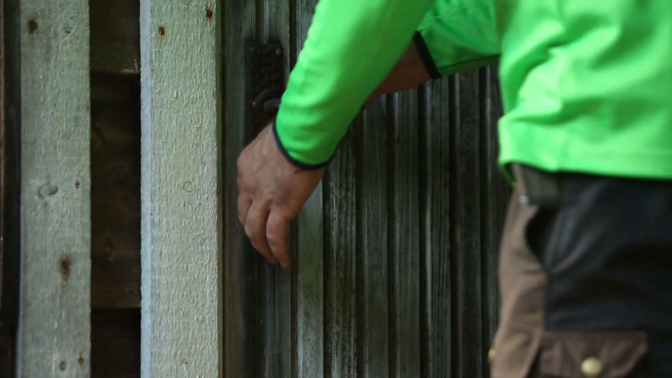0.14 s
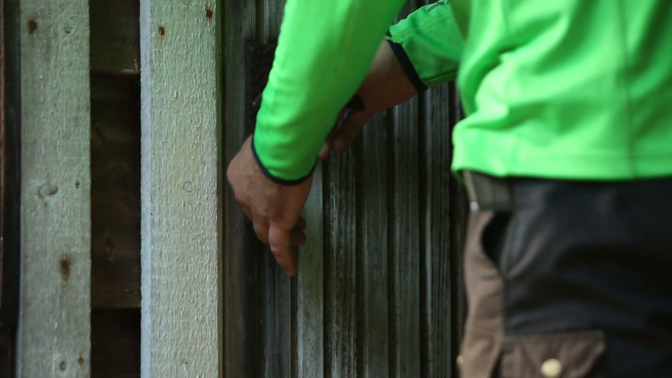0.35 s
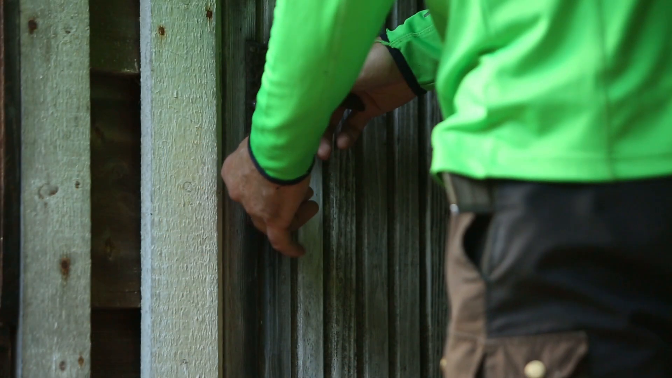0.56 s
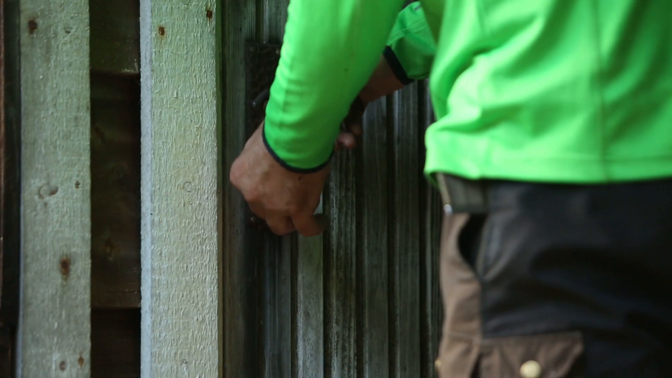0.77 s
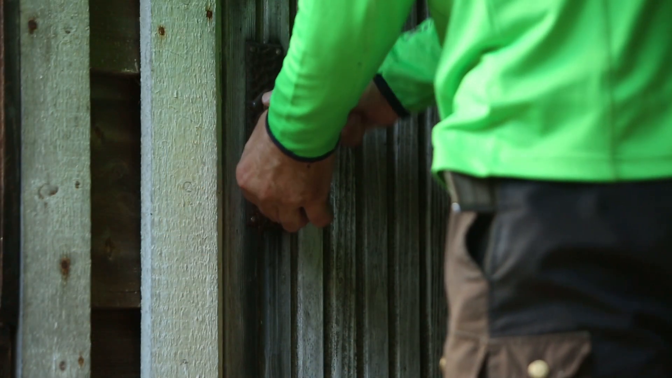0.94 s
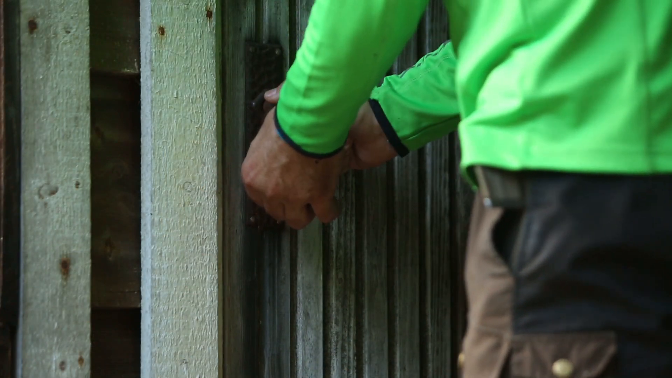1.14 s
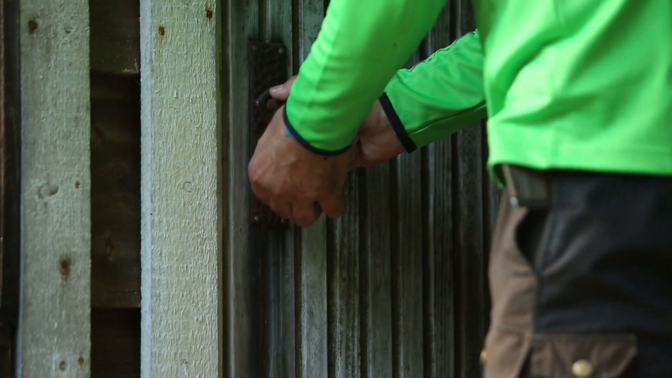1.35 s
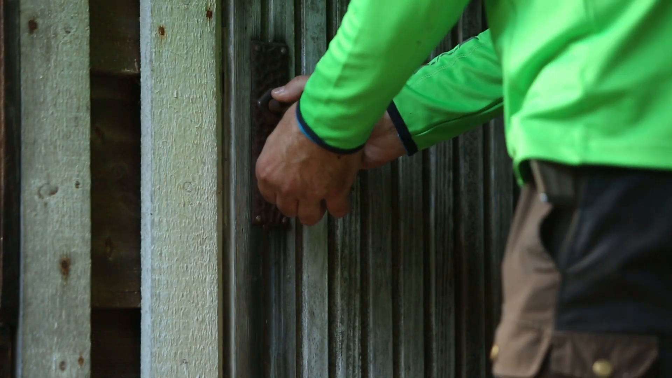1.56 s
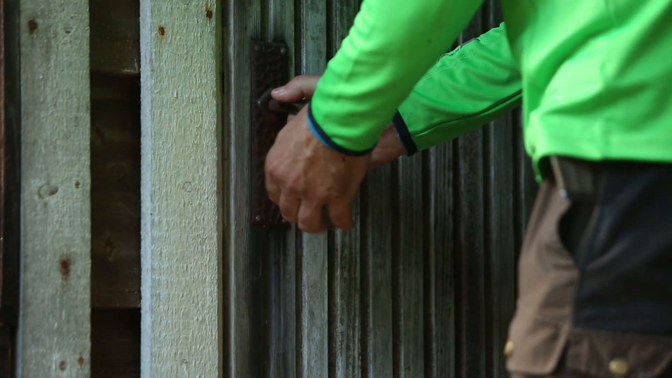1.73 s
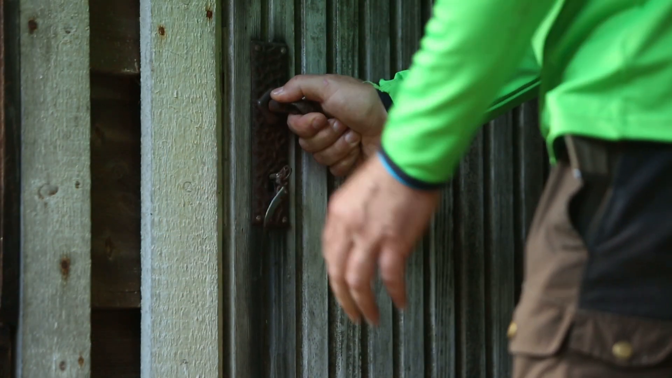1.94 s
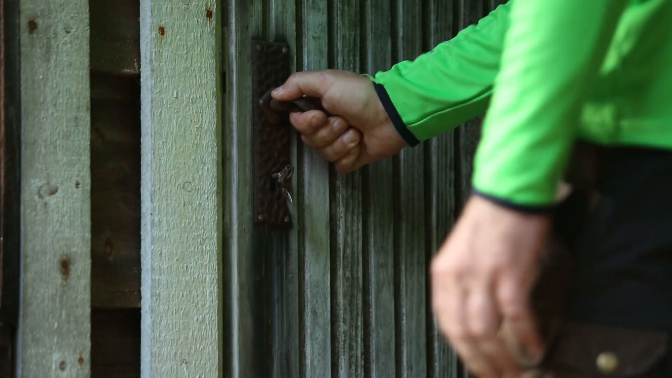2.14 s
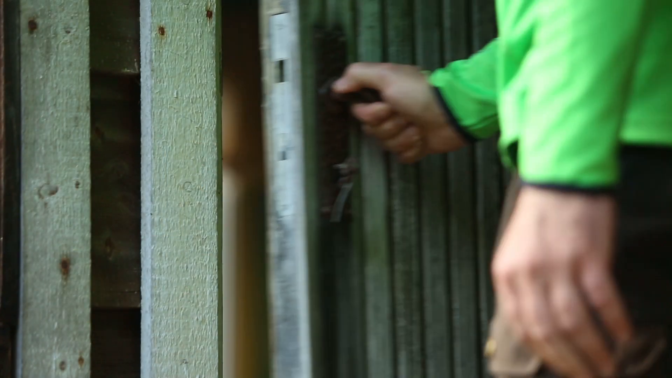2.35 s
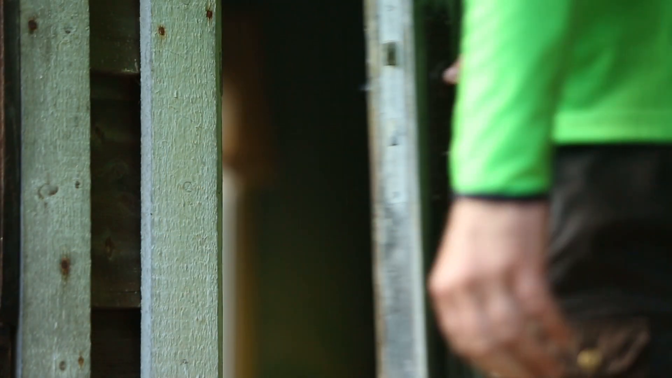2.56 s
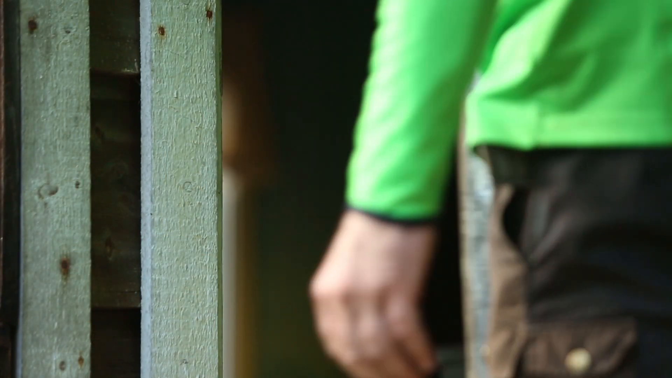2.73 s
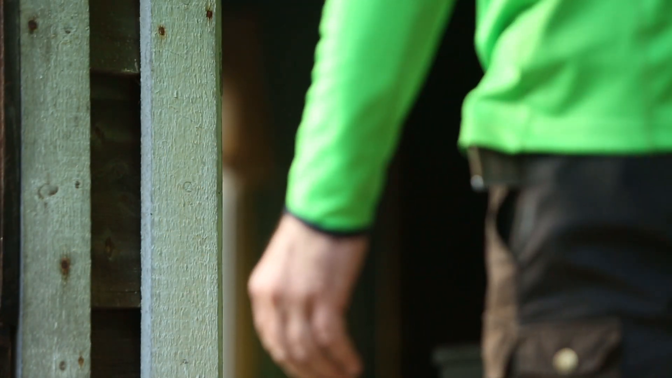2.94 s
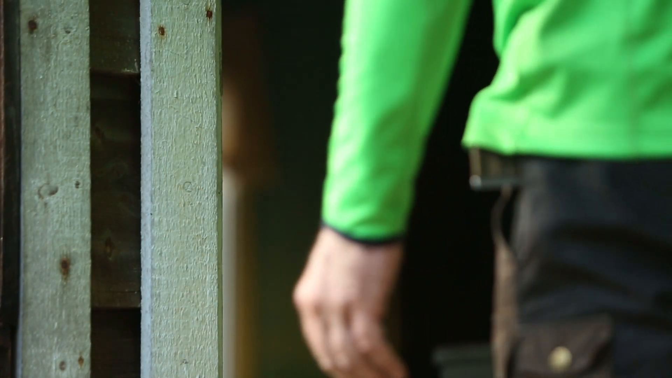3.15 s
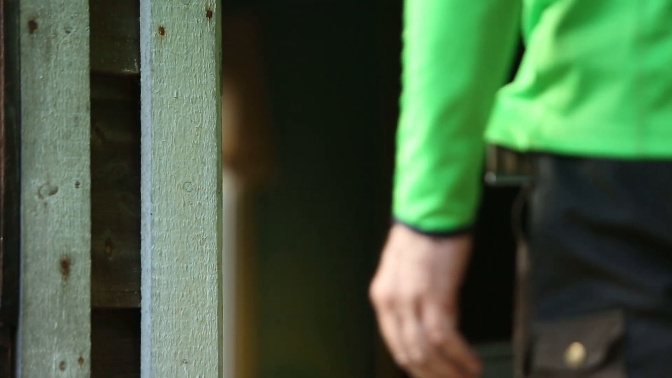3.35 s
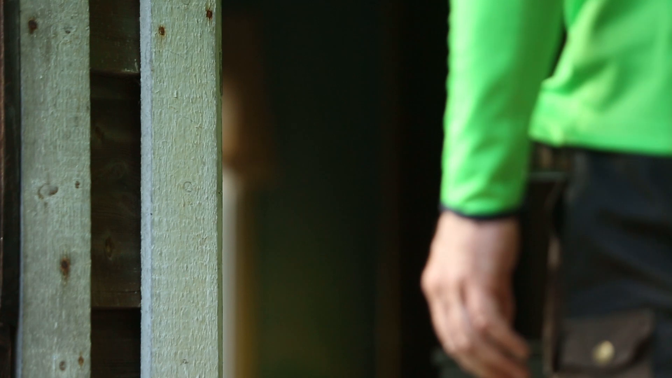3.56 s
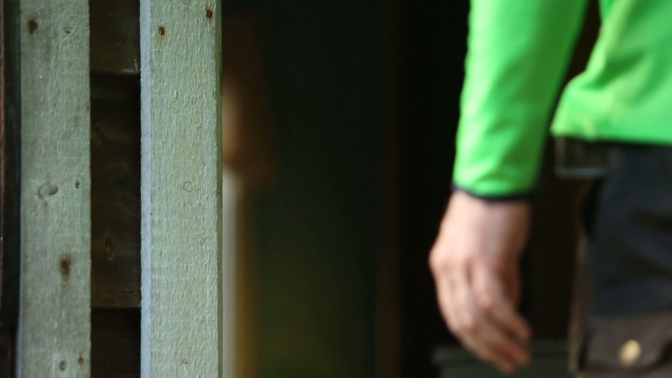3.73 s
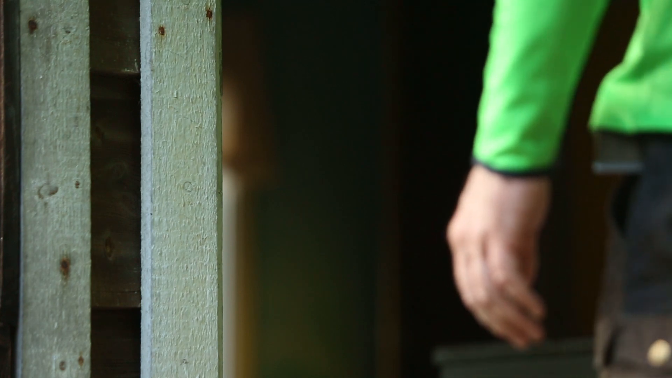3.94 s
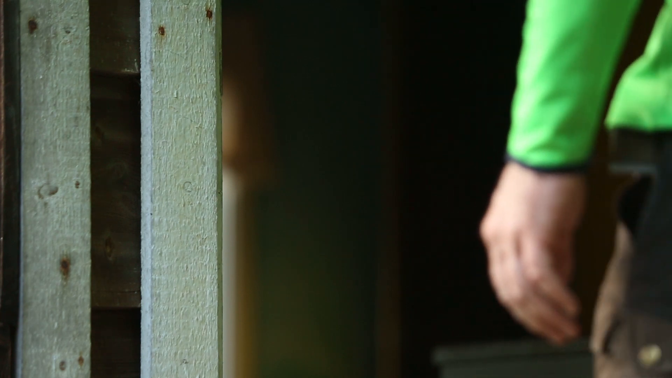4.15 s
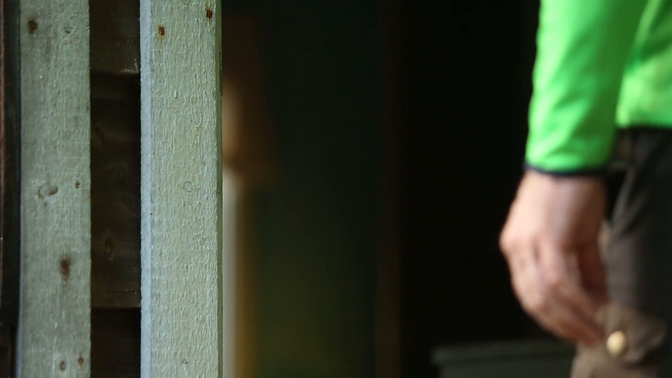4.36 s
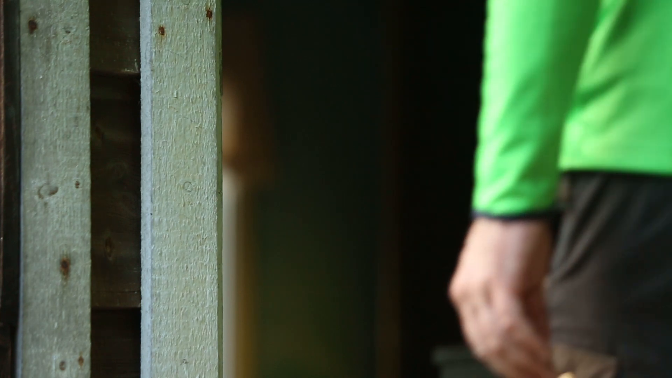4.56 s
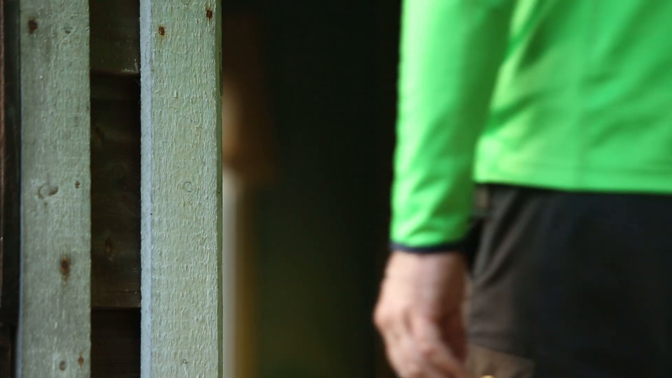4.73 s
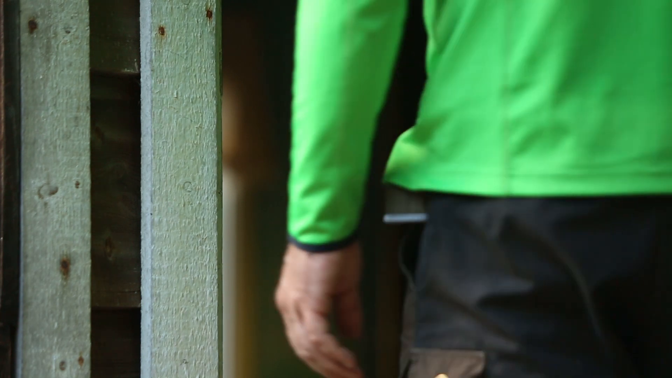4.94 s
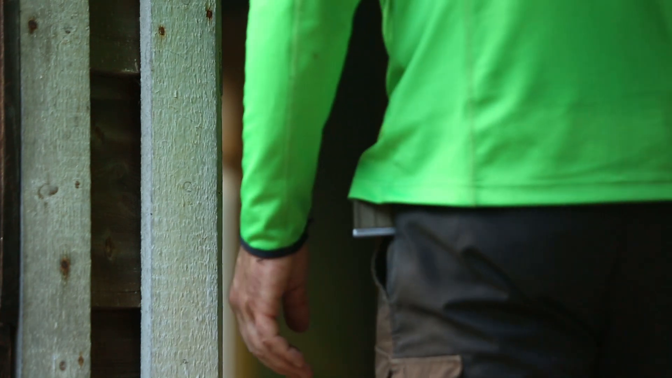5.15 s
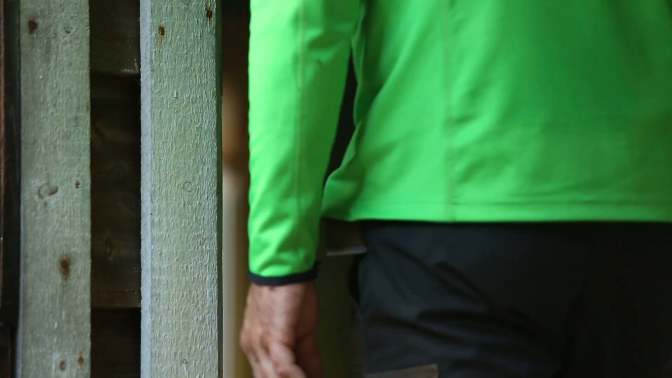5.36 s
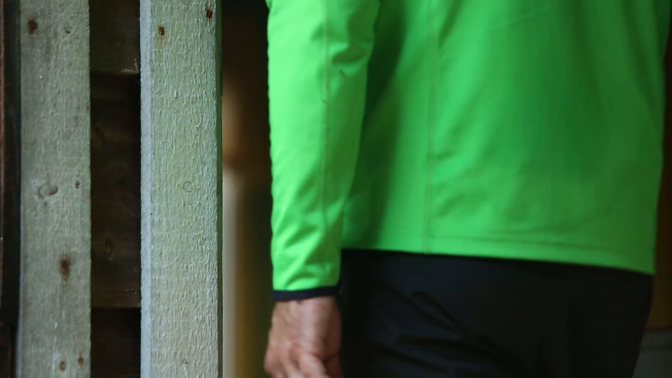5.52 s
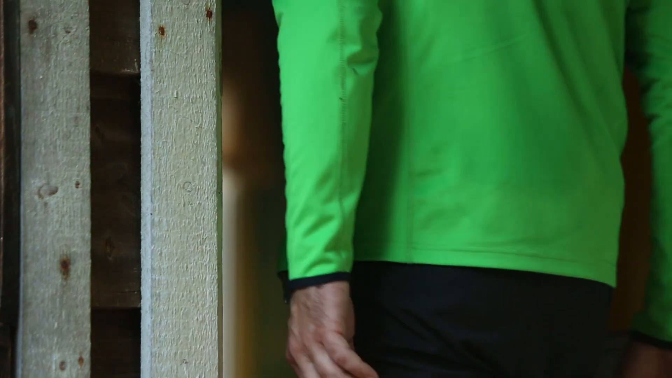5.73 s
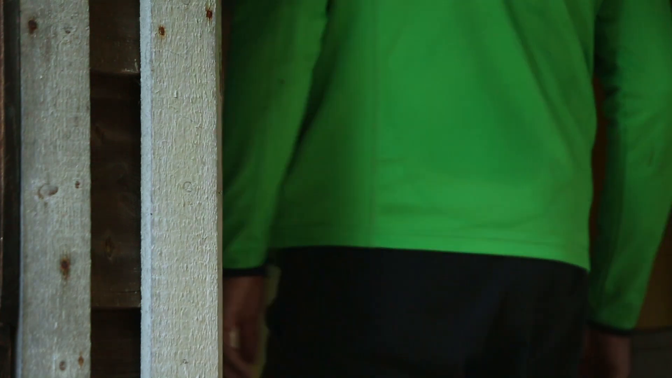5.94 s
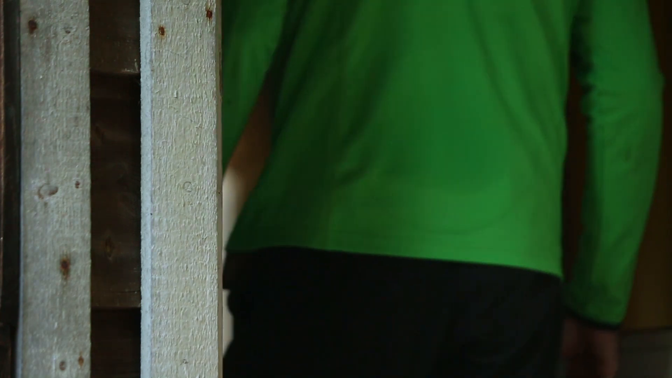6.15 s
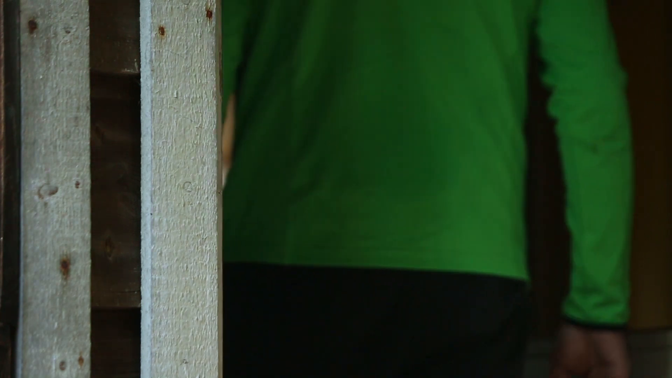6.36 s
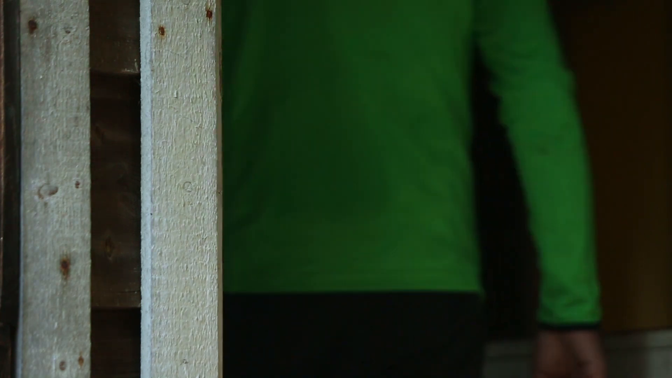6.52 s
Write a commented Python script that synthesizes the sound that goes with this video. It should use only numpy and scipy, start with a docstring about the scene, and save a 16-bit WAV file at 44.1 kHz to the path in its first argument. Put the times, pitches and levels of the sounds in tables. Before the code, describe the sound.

A close, quiet scene at an old plank door, with faint outdoor air and slight hiss. In the first 0.3 seconds there is soft sleeve rubbing and faint low footfalls. Thin metal key ticks follow at 0.3 to 1.0 seconds, the last with a dull wooden knock. A rattling jolt comes at 1.1, then at 1.3 to 1.5 a tight burst of bright knocks and bolt scraping ends in a low shudder. Small ticks precede the sprung handle's sharp ringing snap at 1.9. At 2.25 the sticking door jerks free with a hard woody jolt, then rasps over the sill at about 2.55. A boot booms softly at 3.2, iron fittings clack crisply at 3.7, and a tiny creak comes at 3.95. Boots thud on hollow boards at 4.6 to 5.1, strongest at 5.6, with lighter contacts following and a last soft step at 6.55.

```python
"""A cabin's old plank door is opened, close by: a hanging key ticks, the handle turns and drags the bolt back,
the handle snaps against its stop, and the sticking door jerks free, scrapes over the sill and faintly creaks.
Its iron fittings clack once as it swings wide; boots thud on the floorboards, hardest near the end.
Blows are decaying noise (crowded modes) and decaying sines (separate modes); rubbing and scraping are trains
of tiny slips through the body's resonances; a short room tail and quiet filtered noise complete the scene."""
import sys
import numpy as np
from scipy import signal
from scipy.fft import rfft, irfft, next_fast_len
from scipy.io import wavfile

SR = 44100
rng = np.random.default_rng(int(sys.argv[2]) if len(sys.argv) > 2 else 0)


def wrap_up_sound(samples):
    """Save the sound to the file named by the first command line argument, as 16-bit audio."""
    columns = np.atleast_2d(samples).T
    # keep every value between -1 and 1, then stretch to whole-number steps
    tamed = np.clip(columns, -1, 1)
    steps = np.round(tamed * 32767).astype(np.int16)
    wavfile.write(sys.argv[1], SR, steps)


N = 290619
TOP_HZ = 15850
T = np.arange(SR // 2) / SR  # seconds since a blow or the start of a stroke
HZ = np.fft.rfftfreq(len(T), 1 / SR)


def amp(db):
    """The decibel law: level to amplitude gain."""
    return 10 ** (np.asarray(db) / 20)


def unit(x):
    """Equal power: scale to rms 1."""
    return x / np.sqrt(np.mean(x ** 2) + 1e-20)


def blow(x):
    """Equal energy: scale to that of 10 ms at rms 1."""
    return x / np.sqrt(np.sum(x ** 2) / (SR / 100) + 1e-20)


def along(points, hz):
    """Interpolate (Hz, value) points on a logarithmic frequency axis, as the ear spaces pitch."""
    f, v = np.transpose(points)
    return np.interp(np.log(hz + 1), np.log(f + 1), v)


def tilt(slope_db):
    """Spectral slope: so many dB an octave about 1 kHz, level below 300 Hz."""
    octaves = np.log2(np.clip(HZ, 300, None) / 1000)
    return amp(slope_db * octaves)


def resonances(peaks):
    """Resonance: (Hz, width in Hz, dB) peaks added to a flat gain of 1."""
    return 1 + sum(amp(db) / (1 + (2 * (HZ - hz) / width) ** 2) for hz, width, db in peaks)


def filtered(x, response):
    """Linear filtering: the spectrum of x times a response of frequency."""
    m = next_fast_len(N + SR // 2)
    spectrum = rfft(x, m) * response(np.fft.rfftfreq(m, 1 / SR))
    return irfft(spectrum, m)[..., :N]


def add(track, s, x):
    """Superposition: mix x into the track from time s in seconds."""
    part = track[max(round(s * SR), 0):][:len(x)]
    part += x[:len(part)]


def burst(colour, decay, length=1, rise=0.0001):
    """High modal density: crowded modes struck at once act as noise whose bands die at their own speeds."""
    centres = np.geomspace(40, 16000, 10)
    shares = np.array([np.interp(np.log(HZ + 1), np.log(centres), row) for row in np.eye(len(centres))])
    noise = rfft(rng.standard_normal(len(T))) * colour
    bands = irfft(noise * shares, len(T))
    t60 = length * along(decay, centres)[:, None]
    fade = amp(-60 * T / t60)
    return blow(np.sum(bands * fade, axis=0) * (1 - np.exp(-T / rise)))


def ring(modes, rise=0.00013):
    """Modal ringing: separate (Hz, dB, t60 in seconds) modes die away, their balance new for each blow."""
    tones = np.zeros(len(T))
    for k, (hz, db, t60) in enumerate(modes):
        level_db = db + 1.5 * rng.standard_normal() - 60 * T / t60
        tones += (-1) ** k * amp(level_db) * np.sin(2 * np.pi * hz * T)
    return blow(tones * (1 - np.exp(-T / rise)))


def friction(colour, length, rise, fall, slip_rate):
    """Stick-slip: tiny slips of uneven size excite a body while a stroke swells, holds and dies."""
    slips = (rng.random(len(T)) < slip_rate / SR) * rng.laplace(size=len(T))
    # the stroke falls 40 dB in each fall time
    stroke = np.minimum(T / rise, 1) * 10 ** (-2 * np.maximum(T - length, 0) / fall)
    return stroke * unit(irfft(rfft(slips) * colour, len(T)))


def background():
    """Steady broadband noise: still outdoor air in the centre, faint hiss in opposite phase at the sides."""
    # Spectrum of the air. Each row: frequency in Hz, relative level in dB.
    air_spectrum = [(12, -45), (20, -17), (137, -3.5), (175, -3), (274, -2), (352, -3), (382, -3.5),
                    (478, -5.5), (906, -9.5), (2150, -14), (2760, -15), (6020, -15.5), (15500, -21.5)]
    # Spectrum of the hiss. Each row: frequency in Hz, relative level in dB.
    hiss_spectrum = [(12, -33), (20, -4), (98, -2), (427, -4.5), (549, -4.5), (1070, -7.5), (15500, -6)]
    air = unit(filtered(rng.standard_normal(N), lambda hz: amp(along(air_spectrum, hz))))
    hiss = unit(filtered(rng.standard_normal(N), lambda hz: amp(along(hiss_spectrum, hz))))
    return amp(-62.0) * air + amp(-67) * np.array([hiss, -hiss])


def planks():
    """Source and filter: knocks and rubbing sound through this one response of the timber."""
    # Broad response of the wood. Each row: frequency in Hz, gain in dB.
    wood = [(60, -29), (200, -1.5), (450, 3), (800, 2), (1400, -3.5), (2500, -6), (5500, -11.5),
            (8500, -21.5), (15000, -31.5)]
    # Resonances of the planks. Each row: frequency in Hz, width in Hz, height in dB against the flat part.
    plank_peaks = [(424, 89, -6), (1090, 31, -3), (1394, 68, -4.5), (1945, 60, -7), (2950, 32, 2)]
    return amp(along(wood, HZ)) * resonances(plank_peaks)


def rubs():
    """Sliding friction: sleeve, bolt and door edge rub, grit scrapes under a boot, through one wooden response."""
    # Strokes. Each row: start in seconds, end of the hold in seconds, level in dB,
    # time to fall 40 dB in seconds, brightness in dB per octave.
    strokes = [(0, 0.16, -61, .1, -4), (0.139, 0.214, -52, 0.32, 0.5), (1.352, 1.418, -45.5, 0.11, 3.5),
               (1.408, 1.488, -40, 0.081, 1), (1.795, 1.91, -59, 0.39, -0.5),
               (2.128, 2.191, -55.5, 0.14, 4), (2.278, 2.33, -43.5, 0.12, 1.5),
               (2.371, 2.425, -59, 0.61, 1)]
    out = np.zeros(N)
    wood = planks()
    for start, end, db, fall, bright_db in strokes:
        rub = friction(wood * tilt(bright_db), end - start, rise=0.022, fall=fall, slip_rate=5000)
        add(out, start, amp(db) * rub)
    return out


def steps():
    """Impact on a plate over a cavity: heel, then sole, knock on a board and set the hollow floor booming."""
    # Footfalls. Each row: heel time in seconds, relative boom level in dB, relative knock level in dB,
    # board pitch factor.
    footfalls = [(0.011, -56, -70, 1.16), (0.158, -56, -56, 0.96), (0.258, -58.5, -48, 1.1),
                 (2.138, -44, -44, 0.896), (3.172, -37.5, -51.5, 1.05), (4.594, -43.5, -46, 0.89),
                 (4.736, -46, -49.5, 1.03), (5.099, -54, -55.5, 1.57), (5.632, -28, -31, 0.97),
                 (5.777, -44.5, -46, 1.4), (5.876, -55, -51.5, 0.99), (6.55, -51, -45.5, 0.964)]
    # Modes of the floor at pitch factor 1. Each row: frequency in Hz, relative level in dB, t60 in seconds.
    boards = [(100, -18.5, 0.097), (131, -5.5, 0.098), (154, -0.5, 0.13), (175.4, 0, 0.11),
              (209.4, -7.5, 0.13), (242.6, -12, 0.11), (314, -13.5, 0.18), (407, -20.5, 0.11)]
    # Spectrum of the knock. Each row: frequency in Hz, gain in dB.
    heel_spectrum = [(25, -50), (50, -5), (110, -1), (300, 1.5), (480, 5), (700, -4.5), (1100, -8),
                     (2200, -31), (4000, -29), (9000, -56), (15000, -75)]
    # Modes of the struck board itself at pitch factor 1. Each row: frequency in Hz, relative level in dB,
    # t60 in seconds.
    struck_board = [(326, 0, 0.031), (541, -3, 0.056), (733, -6, 0.043)]
    boom_gain_db, rap_db = 2.5, -5  # the rap is taken against the knock
    sole_lag_s, sole_base_db, sole_bright_db = .038, -12, 2.5  # brightness in dB per octave
    sole_share = 0.27  # dB more on the sole for each dB that the heel is softer
    out = np.zeros(N)
    heel = amp(along(heel_spectrum, HZ)) * resonances([(290, 35, 1.7), (442, 79, 1.8), (716, 40, 0.92)])
    for s, boom_db, knock_db, pitch in footfalls:
        floor_modes = [(hz * pitch, db, t60) for hz, db, t60 in boards]
        # the struck board is half as sensitive to the spot
        board_modes = [(hz * np.sqrt(pitch), db, t60) for hz, db, t60 in struck_board]
        sole_db = sole_base_db + sole_share * (boom_db - knock_db)
        for at, db, bright_db in [(s, 0, 0), (s + sole_lag_s, sole_db, sole_bright_db)]:
            knock = burst(heel * tilt(bright_db), [(200, 0.096), (800, 0.17), (4000, 0.22)], rise=0.00016)
            add(out, at, amp(boom_db + db + boom_gain_db) * ring(floor_modes, rise=0.0026))
            add(out, at, amp(knock_db + db + rap_db) * ring(board_modes, rise=.0007))
            add(out, at, amp(knock_db + db) * knock)
    # the footfalls keep nothing deep below 75 Hz
    return signal.sosfilt(signal.butter(3, 75, "high", fs=SR, output="sos"), out)


def key():
    """Light impact: metal ticks on the lock plate, each with a thin, high modal ring."""
    # Ticks on the plate. Each row: time in seconds, tick level in dB, ring level in dB.
    ticks = [(0.316, -50.5, -57.5), (0.369, -51, -58), (0.576, -46, -57), (0.615, -59, -56.5),
             (0.75, -57.5, -69), (0.976, -45.5, -47.5), (1.719, -54.5, -59), (1.787, -48, -49.5),
             (2.237, -52, -48), (3.649, -59, -55.5)]
    # Modes of key and plate. Each row: frequency in Hz, relative level in dB before the upper modes are
    # shifted, t60 in seconds.
    key_modes = [(2250, -6, 0.25), (3530, -13, 0.097), (8605, 5, 0.13), (8460, -18, .08), (11170, 0, 0.21),
                 (13250, 0, 0.11), (13600, -9, .09)]
    upper_db, upper_spread_db = -4, 3  # shift of the modes above 10 kHz and its random spread
    out = np.zeros(N)
    colour = amp(along([(200, -5.5), (900, 4.5), (1700, -6.0), (2800, -5.0), (7000, -2.5), (15000, -23)], HZ))
    plate = resonances([(850, 120, 0), (1220, 51, 0), (2320, 240, 6), (3130, 480, 4)])
    for s, tick_db, ring_db in ticks:
        # the point of contact differs from tick to tick, and with it the mix of upper modes
        modes = []
        for hz, db, t60 in key_modes:
            shift_db = upper_db + upper_spread_db * rng.standard_normal()
            modes.append((hz, db + shift_db * (hz > 10000), t60))
        add(out, s, amp(tick_db) * burst(colour * plate, [(1000, 0.21), (10000, 0.1)], rise=.0012))
        add(out, s, amp(ring_db) * ring(modes))
    return out


def rattles(count):
    """Repeated impact: a jolt in the frame is a short first touch, a main blow and weaker rebounds."""
    # Jolts. Each row: main blow in seconds, its level in dB, lead of the first touch in seconds,
    # loss per rebound in dB.
    jolts = [(1.120, -37, 0.009, 6), (2.257, -29.5, 0.003, 11.5)]
    touch_db, touch_length = -1, .3  # level against the main blow; factor on the decay times
    length, bright_db, rebound_s = 0.98, 1.14, .046  # decay factor, dB per octave, seconds
    rows = []
    for s, db, lead, loss_db in jolts:
        rows.append((s - lead, db + touch_db, bright_db, touch_length))
        for k in range(count):
            rows.append((s + k * rebound_s, db - k * loss_db, bright_db, length))
    return rows


def leaf(hz):
    """Plate modes: the whole door leaf rings at a main pitch and two higher ones."""
    return ring([(hz, 0, .09), (hz * 1.32, -7, .085), (hz * 2.0, -9, .08)], rise=0.0012)


def knocks():
    """Impact on a plate: each blow sounds through the wooden response and stirs the modes of the leaf."""
    # Single knocks of bolt and timbers, and two faint contacts of footfalls. Each row: time in seconds,
    # level in dB of the blow, its energy evened after the brightness tilt, brightness in dB per octave,
    # factor on the decay times.
    single_knocks = [(0.976, -39, -3.5, 1.6), (1.312, -48.5, -3.5, 1), (1.389, -38, 4, .5),
                     (1.396, -36, 4, 0.85), (1.444, -33.5, 8, 0.22), (1.454, -36, 8, 1.1),
                     (2.754, -51, -1, 1.2), (2.848, -54, -2, 0.88), (5.087, -52.5, 0, 1),
                     (5.881, -58, 5, 1.1)]
    # Decay of the wood at length factor 1. Each row: frequency in Hz, t60 in seconds.
    wood_decay = [(150, 0.24), (1000, 0.13), (5000, 0.16), (14000, 0.027)]
    leaf_hz, leaf_db = 243, -19  # typical pitch; level against the blow at brightness 0
    out = np.zeros(N)
    wood = planks()
    for s, db, bright_db, length in single_knocks + rattles(count=3):
        pitch = leaf_hz * np.exp(0.117 * rng.standard_normal())
        add(out, s, amp(db) * burst(wood * tilt(bright_db), wood_decay, length))
        add(out, s, amp(db + leaf_db - bright_db) * leaf(pitch))  # dull blows stir it more
    return out


def shudders():
    """Release of strain: the whole leaf shudders as bolt and frame let go, lower the freer it is."""
    # Shudders. Each row: time in seconds, level in dB, main pitch of the first bump in Hz.
    releases = [(1.428, -45, 397), (1.462, -36.5, 246), (2.297, -40, 164)]
    swing_back_s, swing_back_db = 0.01602, 0.5  # the leaf's second bump, against the first
    sway_db, thud_db = -49, -2  # slow sway; the planks' thud against the leaf's ring
    out = np.zeros(N)
    sway = amp(along([(15, -15), (50, -3), (100, -3), (300, -18), (1000, -90)], HZ))
    thud = amp(along([(40, -26), (100, -14), (170, -2), (420, 3), (700, -15), (2000, -37)], HZ))
    for s, db, hz in releases:
        add(out, s, amp(db) * leaf(hz))
        add(out, s + swing_back_s, amp(db + swing_back_db) * leaf(hz * .96))
        add(out, s, amp(db + thud_db) * burst(thud, [(100, .3), (600, 0.3)], rise=0.004))
        add(out, s, amp(sway_db) * burst(sway, [(50, 0.46)], rise=0.012))
    return out


def handle():
    """Impact and damping: the sprung handle cracks against its stops and rings until the hand damps it."""
    # Contacts with the stops. Each row: time in seconds, crack level in dB, ring level in dB,
    # factor on the crack's decay times.
    snaps = [(1.9, -54, -72, 0.55), (1.914, -36, -34.5, 0.38), (1.925, -38, -42.5, 0.94),
             (2.235, -50.5, -49, 0.11)]
    # Modes of the undamped handle. Each row: frequency in Hz, relative level in dB, t60 in seconds.
    handle_modes = [(3354, 0, .14), (3400, -3, .07), (4980, 1, .055), (5965, -8, .08), (7553, -1, .15),
                    (11125, -7, .125), (13600, -10, .115)]
    out = np.zeros(N)
    colour = amp(along([(200, -17), (1200, -8.0), (4800, 5.5), (8000, -3.0), (15000, -15)], HZ))
    grip = np.exp(-np.maximum(T - .042, 0) / 0.1)
    for s, crack_db, ring_db, length in snaps:
        add(out, s, amp(crack_db) * burst(colour, [(1000, 0.28), (4000, 0.12), (10000, 0.13)], length))
        add(out, s, amp(ring_db) * grip * ring(handle_modes))
    return out


def sill_and_hinge():
    """Load-dependent friction: the foot rasps over the sill, then the hinge creaks; light contact is duller."""
    # A drag over the sill, then a short, faint creak of the hinge: one list of points for each.
    # Each row: time in seconds, relative level in dB.
    drags = [
        [(2.5, -62), (2.55, -58.5), (2.558, -42), (2.608, -40.5), (2.642, -57), (2.68, -64)],
        [(3.88, -76), (3.948, -58), (4.0, -79)],
    ]
    # Response at firm contact. Each row: frequency in Hz, gain in dB.
    sill_response = [(100, -25), (330, -17), (460, -14.5), (650, -13), (1020, -4.5), (1500, -7),
                     (2300, -10), (3200, -8), (6000, -16.5), (8500, -33), (14000, -40)]
    # Resonances at firm contact. Each row: frequency in Hz, width in Hz, height in dB against the flat part.
    sill_peaks = [(463, 43, 8.5), (1012, 54, 12.5)]
    firm_db, firm_law = -44, 0.6  # level at firm contact; firmness goes with this power of the amplitude
    light_pitch, light_bright_db = 0.893, -4  # pitch factor and dB per octave of light contact
    drag_db = 0.5  # raises both strokes
    out = np.zeros(N)
    firm = amp(along(sill_response, HZ)) * resonances(sill_peaks)
    light = np.interp(HZ / light_pitch, HZ, firm) * tilt(light_bright_db)
    for drag in drags:
        s, db = np.transpose(drag)
        level_db = np.interp(s[0] + T, s, db)
        firmness = np.minimum(amp(firm_law * (level_db - firm_db)), 1)
        for colour, share in [(firm, firmness), (light, 1 - firmness)]:
            rasp = friction(colour, s[-1] - s[0], rise=0.012, fall=0.12, slip_rate=4000)
            # the two rasps are independent, so their powers share the level
            add(out, s[0], amp(level_db + drag_db) * np.sqrt(share) * rasp)
    return out


def fittings():
    """Clustered impacts: loose iron gives hard cracks and short rings that shift with each contact."""
    # Contacts. Each row: time in seconds, relative level in dB, factor on the decay times
    # (at most 1 for the ring).
    clacks = [(3.674, -33.5, 0.16), (3.677, -30, 0.77), (3.683, -24.5, 0.71), (3.694, -32, 1)]
    # Modes of the iron before each contact shifts them. Each row: frequency in Hz, relative level in dB.
    iron = [(3090, -50), (4161, -56), (4592, -69), (4872, -41.5), (5028, -50), (5265, -56), (5443, -46),
            (5626, -40), (6368, -42), (6659, -50), (6783, -53), (6950, -62), (7397, -64), (7854, -50),
            (8096, -45), (8339, -50), (8742, -50), (8958, -53), (11149, -52), (13254, -67)]
    # Spectrum of the crack. Each row: frequency in Hz, gain in dB.
    crack_spectrum = [(120, -54), (200, -30.5), (1620, -15.5), (1980, -11), (3610, -8), (4840, -1),
                      (8050, -10), (9660, -18.5), (11400, -15.5), (13600, -23), (15500, -37)]
    out = np.zeros(N)
    colour = amp(along(crack_spectrum, HZ))
    for s, db, length in clacks:
        t60 = .05 * min(length, 1)
        modes = [(hz * (1 + .008 * rng.standard_normal()), level, t60) for hz, level in iron]
        add(out, s, amp(db - 3) * burst(colour, [(500, 0.19), (4000, 0.076), (12000, 0.11)], length))
        add(out, s, amp(db - 5.0) * ring(modes))
    return out


def cabin(x, wet_db):
    """Reverberation: convolution with a decaying noise tail gives the short answer of the wooden room."""
    # Decay of the room. Each row: frequency in Hz, t60 in seconds.
    room_decay = [(100, 0.5), (400, 0.42), (2000, 0.41), (6000, 0.35), (14000, 0.086)]
    colour = amp(along([(60, 0.0), (300, 4.5), (1500, 2.5), (6000, -1.5), (15000, 6.5)], HZ))
    tail = burst(colour, room_decay, rise=0.011)
    return x + amp(wet_db) * signal.fftconvolve(x, tail / np.linalg.norm(tail))[:N]


def scene():
    """Superposition, straight ahead: the handle is heard dry and close, the door and boots with the room."""
    lock = handle() + cabin(key(), wet_db=-11.5)
    timber = cabin(rubs() + knocks() + shudders() + sill_and_hinge(), wet_db=-16.5)
    inside = cabin(fittings(), wet_db=-17) + cabin(steps(), wet_db=-13.0)
    return lock + timber + inside + background()


def record(dry):
    """Band limiting: nothing is kept from TOP_HZ upward."""
    return filtered(dry, lambda hz: hz < TOP_HZ)


dry = scene()
out = record(dry)
wrap_up_sound(out)
```